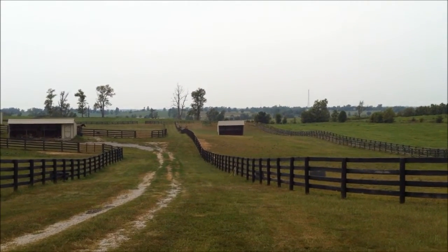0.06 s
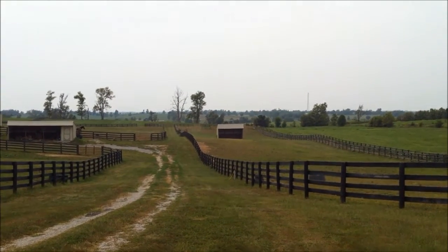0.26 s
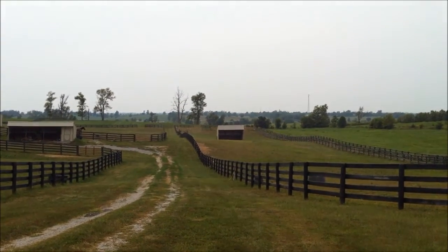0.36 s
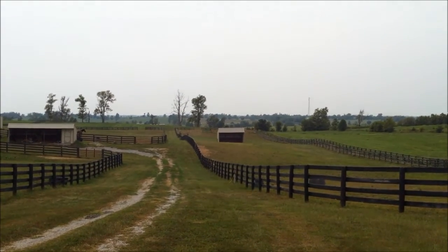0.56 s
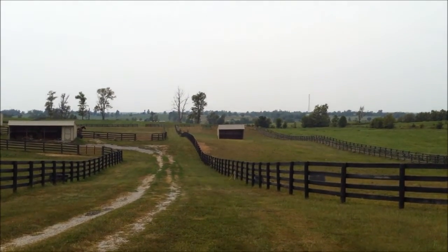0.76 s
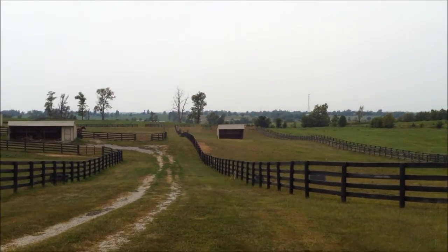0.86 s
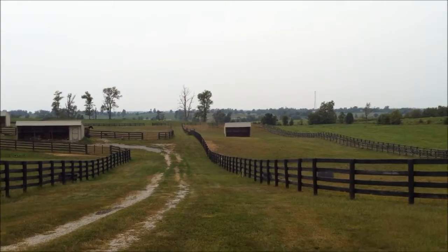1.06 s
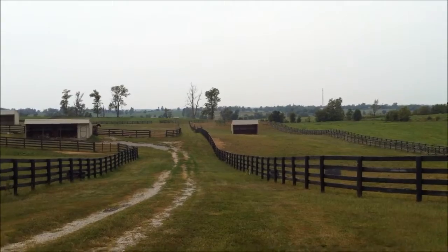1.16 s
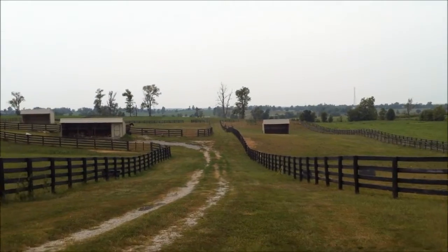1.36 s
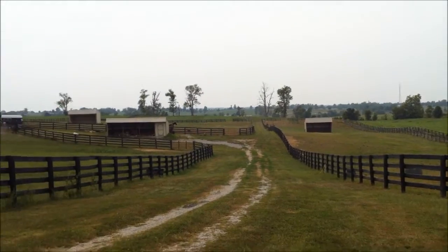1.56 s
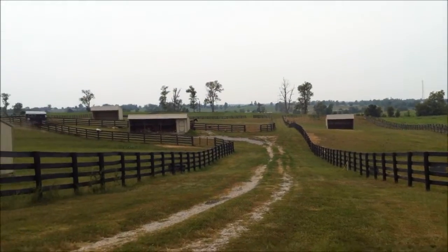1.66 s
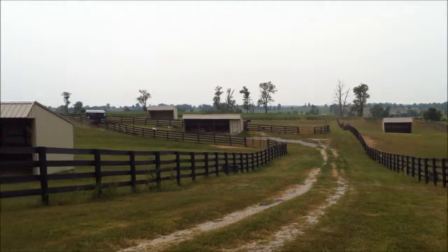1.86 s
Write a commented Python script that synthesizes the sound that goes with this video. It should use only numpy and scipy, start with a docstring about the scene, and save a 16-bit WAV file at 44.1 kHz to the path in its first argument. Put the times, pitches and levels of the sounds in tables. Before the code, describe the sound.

One distant horse whinny starts high, then sinks and quavers over faint open-air hiss.

```python
"""Horse across a paddock

One neigh, far from the microphone, in two voices: it opens on a clean high whistle, then a lower,
hoarse voice joins in, sinks and breaks into a quaver of about ten shakes a second. Sheds throw it back.
Under it lie a steady outdoor hiss, a low throb that swells at the end, and a small rattle nearby."""
import sys
import numpy as np
from scipy import signal
from scipy.fft import rfft, irfft
from scipy.io import wavfile
from scipy.ndimage import uniform_filter1d

SR = 44100
rng = np.random.default_rng(int(sys.argv[2]) if len(sys.argv) > 2 else 0)


def dump(signal):
    """Clip the signal to [-1, 1] and save it as 16-bit WAV at the path in sys.argv[1]."""
    limited = np.clip(np.atleast_2d(signal).T, -1, 1)
    pcm = np.round(limited * 32767).astype(np.int16)
    wavfile.write(sys.argv[1], SR, pcm)


N = 83790
TIME = np.arange(N) / SR
VOICE_JITTER, WHISTLE_JITTER, JITTER_HZ = .021, .02, 69.6   # two shares of pitch, and their rate


def neigh():
    """The horse, far across the paddock: two voices, ringing tones and breath, notched by the nose."""
    low_phase = phase_of(low_pitch())
    voices = whistle(low_phase) + hoarse_voice(low_phase) + ringing(HELD_TONE) + ringing(ARCHING_TONE)
    nose_notch = signal.iirnotch(2460, Q=21.8, fs=SR)
    return signal.lfilter(*nose_notch, voices + breath())


# the high voice: time_s, pitch_hz, level_db, roughness_share
HIGH_VOICE = [(.1, 1498, -98, 0.11), (.125, 1580, -65, 0), (.168, 1763, -59.5, 0.08), (.24, 1793, -42.5, 0),
              (.295, 1805, -38.5, 0.02), (.325, 1835, -36.5, 0.01), (.36, 2014, -45.5, 0.29),
              (.48, 2201, -50.5, 0.84), (.6, 2038, -50, 0.64), (.7, 1886, -48, 0.3), (.78, 1860, -49, 0.35),
              (.86, 1846, -61, 0.6), (1.0, 1837, -52, 0.49), (1.33, 1790, -65, 0.92)]
# tones made of the two voices' pitches: high_multiple, low_multiple, level_db
BEAT_TONES = [(1, -1, -21), (2, 0, -11.5)]
def whistle(low_phase):
    """The high voice: a pure tone that thickens, turns rough and beats with the low voice."""
    hz, db, roughness = curves(HIGH_VOICE)
    hz = hz * (1 + WHISTLE_JITTER * roughness * drift(JITTER_HZ))
    beats = sum(from_db(beat_db) * np.sin(round(high) * phase_of(hz) + round(low) * low_phase)
                for high, low, beat_db in BEAT_TONES)
    sounding = TIME < HIGH_VOICE[-1][0]
    return from_db(db) * (rough_tone(hz, roughness) + np.sqrt(2) * roughness * beats) * sounding


# the low voice: time_s, pitch_hz, quaver_share
LOW_VOICE = [(.29, 595, 0.0039), (.325, 743.3, 0.032), (.41, 760.2, 0.045), (.68, 695.2, 0.024),
             (.77, 737, 0.05), (.83, 624.8, 0.11), (.92, 546.3, 0.1636), (1.15, 495.2, 0.1585),
             (1.55, 450.4, 0.14)]
# the bottom of each shake: time_s
SHAKE_TIMES = [0.308, 0.388, .47, 0.557, .61, 0.69, .8, .918, 1.015, 1.119, 1.21, 1.321, 1.43, 1.53, 1.64]
def quaver():
    """Relative swing of the low voice's pitch: one dip per shake."""
    shake_count = np.interp(TIME, SHAKE_TIMES, np.arange(len(SHAKE_TIMES)))
    return -curves(LOW_VOICE)[1] * np.cos(2 * np.pi * shake_count)


def low_pitch():
    """The low voice sinks, quavers and jitters."""
    return curves(LOW_VOICE)[0] * (1 + quaver()) * (1 + VOICE_JITTER * drift(JITTER_HZ))


# the low voice's fundamental, with its octave: time_s, level_db
FUNDAMENTAL_LEVEL = [(.2, -101), (.29, -72), (.36, -63), (.6, -64), (1.4, -64), (1.46, -74), (1.53, -63),
                     (1.66, -92)]
# the hoarse voice in three ranges: time_s, low_db, middle_db, treble_db
HOARSE_LEVELS = [(.14, -105, -78, -89), (.255, -61.5, -52, -67.5), (.31, -53.5, -54.5, -59),
                 (.4, -61.5, -47.5, -61), (.49, -57.5, -47, -57.5), (.58, -70, -51.5, -59.5),
                 (0.72, -62.5, -51.5, -61.5), (.85, -48, -49, -62), (.99, -56, -50, -63),
                 (1.14, -56, -50, -64.5), (1.27, -61.5, -56, -65), (1.4, -54, -58, -63.5),
                 (1.46, -67, -63.5, -68.5), (1.56, -61, -60, -68), (1.74, -77.5, -77, -92)]
# the lowest throat resonance moves and widens: time_s, centre_hz, width_hz
THROAT_LOW = [(.26, 1152, 60), (.32, 1253, 70), (.7, 1210, 108), (.83, 1100, 130), (.96, 1083, 300)]
# middle and treble throat resonances: centre_hz, width_hz, relative_db
THROAT_MIDDLE = [(1583.5, 80, 4), (1836, 136, 2), (2035, 120, -0.5), (2288, 174, -3)]
THROAT_TREBLE = [(2980, 410, 1.5), (3524, 185, 4), (4060, 610, 2), (4910, 320, -4.5)]
# the mouth closes and the upper middle resonances fade: time_s, tilt_db_per_octave
MOUTH_TILT = [(.25, -41), (.35, 6), (.8, 28), (.97, -1), (1.15, -6), (1.6, 3)]
# the treble dulls as the call sinks: time_s, tilt_db_per_octave
TREBLE_DULLING = [(.85, 4), (1.2, -15.5)]
def hoarse_voice(phase, rasp_db=6, treble_rasp_db=3, octave_db=-3, flutter=.43):
    """Pulses and a puff of noise per cycle ring in the throat, over a rough fundamental and its octave."""
    pulses = rms_one(sum(np.cos(k * phase) for k in range(1, 13)))
    puffs = rms_one(rng.standard_normal(N) * (1 + np.cos(phase)))
    source = pulses + from_db(rasp_db) * puffs
    treble_source = pulses + from_db(treble_rasp_db) * puffs
    octave = from_db(octave_db) * resonate(np.sin(2 * phase), hz=1000, width_hz=173.3)
    tone = np.sqrt(2) * (np.sin(phase) + octave) * (1 + flutter * drift(2 * JITTER_HZ))
    low_db, middle_db, treble_db = curves(HOARSE_LEVELS)
    low = from_db(low_db) * evened(resonate(source, *curves(THROAT_LOW)))
    middle = from_db(middle_db) * throat(source, THROAT_MIDDLE, MOUTH_TILT)
    treble = from_db(treble_db) * throat(treble_source, THROAT_TREBLE, TREBLE_DULLING)
    return from_db(curves(FUNDAMENTAL_LEVEL)[0]) * tone + low + middle + treble


def throat(source, modes, tilt, quaver_share=.13):
    """A group of resonances, tilted along a curve and bent by the quaver; rms 1."""
    bend = 1 + quaver_share * quaver()
    slope = curves(tilt)[0]
    return evened(sum(from_db(db + slope * np.log2(hz / modes[0][0])) * resonate(source, hz * bend, width)
                      for hz, width, db in modes))


# one tone held, one arching above it: time_s, pitch_hz, level_db
HELD_TONE = [(.89, 1601, -58), (.97, 1598, -46.5), (1.07, 1591, -60), (1.145, 1608, -48), (1.22, 1618, -62),
             (1.265, 1567, -50.5), (1.43, 1568, -63.5)]
ARCHING_TONE = [(.97, 2200, -60), (1.095, 2390, -49), (1.13, 2300, -56), (1.22, 2296, -55.5),
                (1.36, 2285, -80)]
def ringing(curve):
    """A narrow wavering tone that rings out of the quaver."""
    hz, db = curves(curve)
    hz = hz * (1 + VOICE_JITTER * drift(JITTER_HZ))
    sounding = (TIME > curve[0][0]) & (TIME < curve[-1][0])
    return sounding * from_db(db) * rough_tone(hz, roughness=.14)


# strength of the breath: time_s, level_db
BREATH_LEVEL = [(.15, -92), (.3, -65.5), (.72, -69.5), (.92, -62.5), (1.12, -65.5), (1.25, -69),
                (1.7, -106)]
# its colour: frequency_hz, relative_db
BREATH_SPECTRUM = [(300, -19), (900, 28.5), (2500, -19), (5000, 13), (8000, 13.5), (11000, 5), (15500, -26)]
def breath():
    """Air rushing out with the call."""
    return from_db(curves(BREATH_LEVEL)[0]) * coloured_noise(BREATH_SPECTRUM)


def yard_echo(sound, t60_s=.56, level_db=-6.5, dull_hz=4230, delay_s=.025):
    """Dull, scattered echoes reach the microphone from sheds, fences and ground."""
    tail = rng.standard_normal(N) * from_db(-60 * TIME / t60_s) * (TIME > delay_s)
    tail /= np.sqrt(np.sum(tail ** 2))
    tail = signal.sosfilt(signal.butter(1, dull_hz, fs=SR, output="sos"), tail)
    return from_db(level_db) * signal.fftconvolve(sound, tail)[:N]


# the rattle's contacts: start_s, level_db
RATTLE_HITS = [(1.733, -56.5), (1.756, -54), (1.776, -58), (1.796, -59.5)]
# their ring: centre_hz, width_hz, relative_db
RATTLE_RING = [(1974, 220, -4), (2800, 370, -4)]
def rattle(decay_s=.013):
    """A few gritty contacts near the microphone, each dying quickly."""
    contacts = sum(from_db(db) * (TIME > s) * np.exp(-np.abs(TIME - s) / decay_s) for s, db in RATTLE_HITS)
    grit = rng.standard_normal(N)
    return contacts * evened(sum(from_db(db) * resonate(grit, hz, width) for hz, width, db in RATTLE_RING))


# swells of the low throb: peak_s, level_db
THROB_SWELLS = [(1.233, -66.5), (1.347, -60), (1.49, -65), (1.575, -63.5), (1.65, -61), (1.755, -61.5),
                (1.84, -60.5)]
def throb(pitch_hz=169, sag_hz_per_s=53, wander=.151, half_width_s=.032):
    """A low wavering tone that comes in short soft swells under the end of the call."""
    swells = sum(from_db(db) * np.exp(-2 * ((TIME - s) / half_width_s) ** 2) for s, db in THROB_SWELLS)
    hz = pitch_hz - sag_hz_per_s * (TIME - THROB_SWELLS[0][0])
    return np.sqrt(2) * swells * np.sin(phase_of(hz * (1 + wander * drift(rate_hz=80))))


# the paddock's background: frequency_hz, relative_db
HISS_SPECTRUM = [(50, -2.5), (140, 2.5), (220, 2.5), (330, -6.5), (500, 1), (850, -6), (1650, -1.5),
                 (2500, -8.5), (6500, -11.5), (9500, -8.5), (11000, -13.5), (15500, -9.5)]
def outdoor_hiss(level_db=-62):
    """The steady hiss of the open air around the microphone."""
    return from_db(level_db) * coloured_noise(HISS_SPECTRUM)


def rough_tone(hz, roughness):
    """A pitched tone, a share of it blurred into a narrow rasp; rms 1."""
    rasp = evened(resonate(rng.standard_normal(N), hz, width_hz=180))
    return np.sqrt(2 * (1 - roughness)) * np.sin(phase_of(hz)) + np.sqrt(roughness) * rasp


def resonate(x, hz, width_hz):
    """A steep-sided resonance whose centre and width may move."""
    carrier = np.exp(1j * phase_of(hz + 0 * TIME))
    clock = np.cumsum(width_hz + 0 * TIME)   # runs faster where the resonance is wider
    even_clock = np.linspace(clock[0], clock[-1], N)
    lowpass = signal.butter(2, np.mean(width_hz) / 2, fs=SR, output="sos")
    baseband = signal.sosfilt(lowpass, np.interp(even_clock, clock, x / carrier))
    return 2 * np.real(np.interp(clock, even_clock, baseband) * carrier)


def coloured_noise(spectrum):
    """Steady noise with a given colour, rms 1."""
    hz, db = np.transpose(spectrum)
    bins_hz = np.maximum(np.arange(N // 2 + 1) * SR / N, 1)
    gain = from_db(np.interp(np.log(bins_hz), np.log(hz), db))
    return rms_one(irfft(rfft(rng.standard_normal(N)) * gain, N))


def drift(rate_hz):
    """Smooth random wander, rms 1."""
    pole = np.exp(-2 * np.pi * rate_hz / SR)
    return rms_one(signal.lfilter([1], [1, -2 * pole, pole * pole], rng.standard_normal(N + SR))[SR:])


def curves(rows):
    """Each column of a timed table, sample by sample."""
    times, *columns = np.transpose(rows)
    return [np.interp(TIME, times, column) for column in columns]


def phase_of(hz):
    """Phase of an oscillator that follows a pitch."""
    return 2 * np.pi * np.cumsum(hz) / SR


def evened(x):
    """Hold the slow level at rms 1."""
    return x / np.sqrt(np.abs(uniform_filter1d(x ** 2, size=1500)) + 1e-12)


def rms_one(x):
    """Scale to rms 1."""
    return x / np.sqrt(np.mean(x ** 2) + 1e-20)


def from_db(db):
    """Decibels to gain."""
    return 10 ** (np.asarray(db) / 20)


def scene():
    """The far neigh, the near rattle and their echoes over the background, the same in both channels."""
    direct = neigh() + rattle()
    mono = direct + yard_echo(direct) + throb() + outdoor_hiss()
    return np.array([mono, mono])


LOW_CUT_HZ, HIGH_CUT_HZ = 118, 15750
def record(dry):
    """The microphone drops the deep bass; the top is cut steeply."""
    thinned = signal.sosfilt(signal.butter(2, LOW_CUT_HZ, "high", fs=SR, output="sos"), dry)
    return signal.sosfilt(signal.ellip(12, .1, 70, HIGH_CUT_HZ, fs=SR, output="sos"), thinned)


dry = scene()
out = record(dry)
dump(out)
```